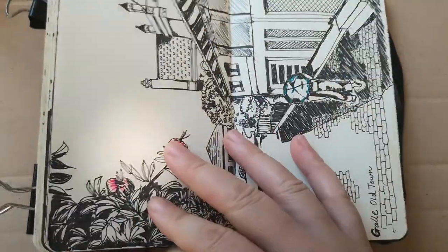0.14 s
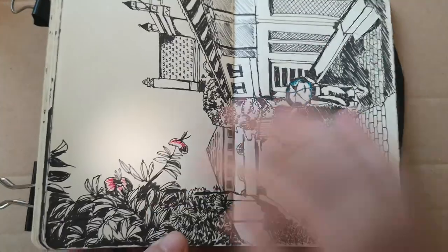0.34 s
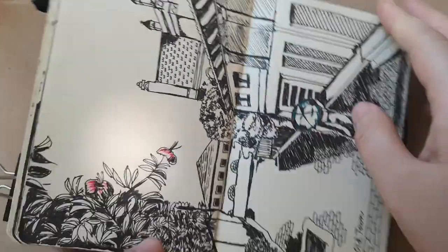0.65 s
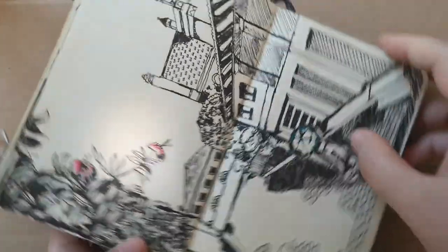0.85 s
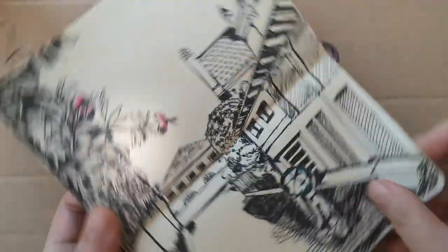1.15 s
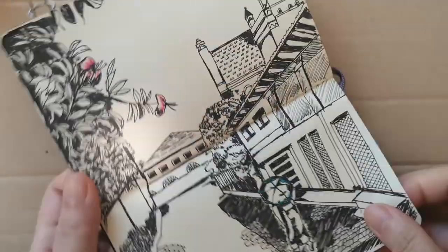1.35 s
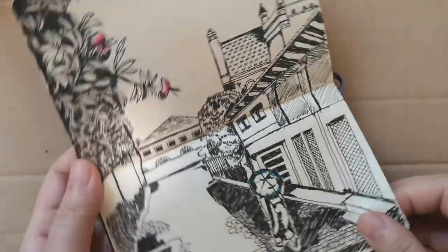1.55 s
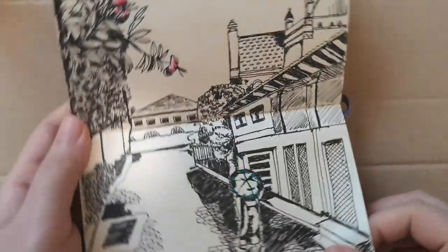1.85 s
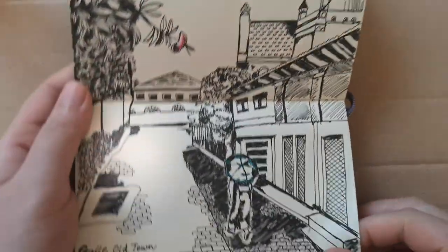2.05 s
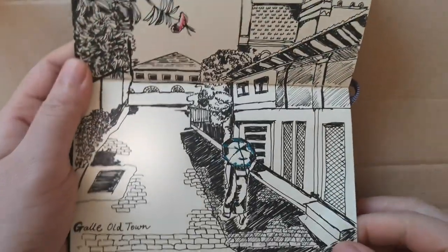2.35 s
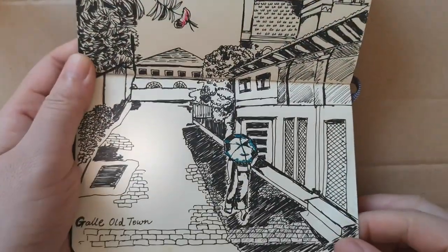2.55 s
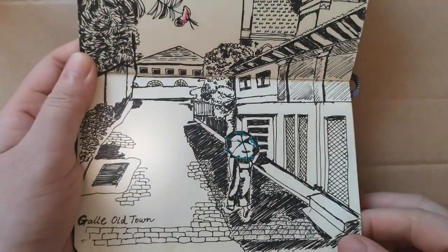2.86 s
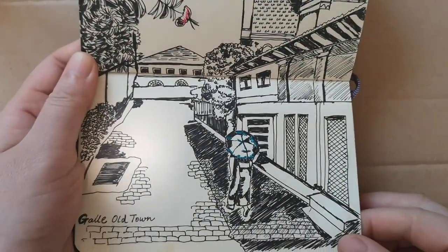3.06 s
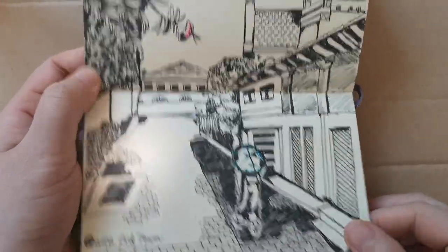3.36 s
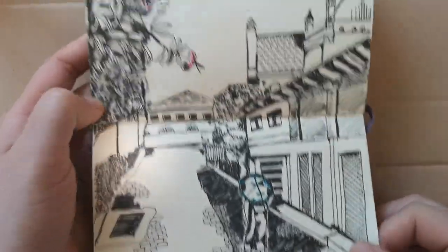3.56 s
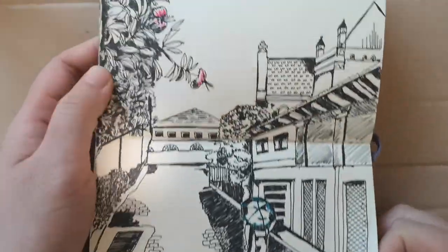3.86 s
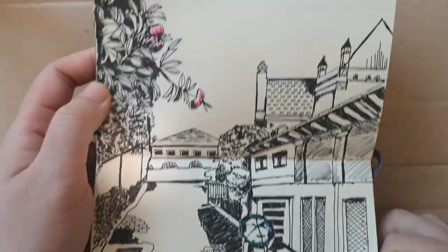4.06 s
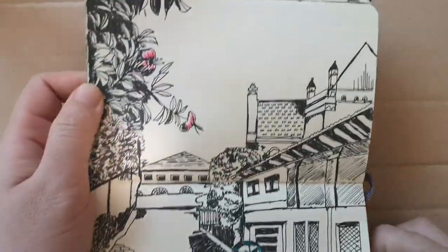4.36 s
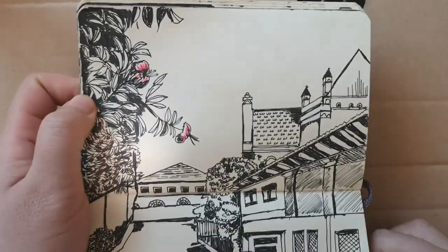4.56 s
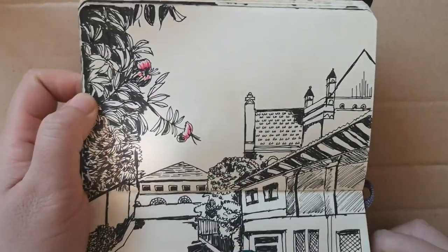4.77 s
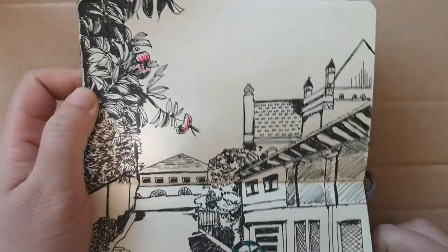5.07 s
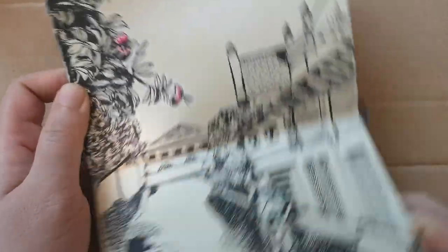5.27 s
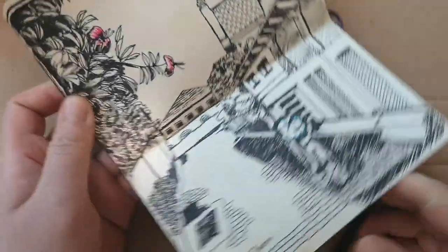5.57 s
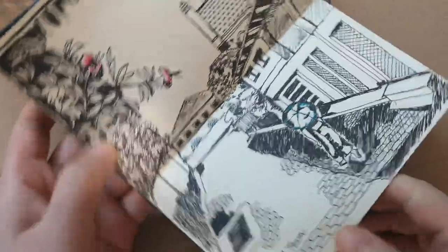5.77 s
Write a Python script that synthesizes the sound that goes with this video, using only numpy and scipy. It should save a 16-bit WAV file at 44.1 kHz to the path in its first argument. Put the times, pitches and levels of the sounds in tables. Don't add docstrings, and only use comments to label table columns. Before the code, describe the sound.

Close stereo phone pickup above a cardboard-covered desk, in a small quiet room with low hum. At 0 s a dull knock and short, already moving scrape with paper rub die away by 0.15 s. Faint rustle and a soft tap come at 0.33 s, light finger hiss and nudges at 0.45-0.7 s. From 0.78 to 1.4 s the book is turned: hollow cardboard scraping, crisp page rubs, buckling crackles, and the loudest thump at 1.22 s, with smaller knocks near 1.34 and 1.39 s. A loose clip lands in four weakening low thuds at 1.6-1.82 s, over soft sliding that fades by 2.4 s. Near silence, one lone knock at 2.73 s. A small knock and rustle at 3.6 s lead to sparse, dry, high spine ticks from 3.7 to 4.67 s, two clearest near 4.38 and 4.67 s. Quiet until 5.2 s, then soft crinkles, swishes and gentle sliding to 5.9 s.

```python
import sys
import numpy as np
from scipy import signal
from scipy.fft import rfft, irfft, next_fast_len
from scipy.io import wavfile
from scipy.ndimage import uniform_filter1d, map_coordinates

SR = 44100
rng = np.random.default_rng(int(sys.argv[2]) if len(sys.argv) > 2 else 0)


def gain_from_decibels(decibels):
    exponent = np.asarray(decibels, float) / 20
    return 10 ** exponent


def put_to_file(sound):
    columns = np.atleast_2d(sound).T
    safe = np.clip(columns, -1, 1)
    whole_steps = np.round(safe * 32767)
    wavfile.write(sys.argv[1], SR, whole_steps.astype(np.int16))


N = 260631
CONTROL_S = np.arange(N * 1000 // SR + 2) / 1000


# time in seconds, left-right in dB.
SIDE_OF_HISS = [(0.0, 6), (0.56, 9.5), (0.79, 1), (0.92, 8.5), (3.09, -1), (3.36, 15), (3.64, 2), (3.8, 6),
                (4.72, 5), (4.99, -3), (5.12, 20), (5.53, 3), (5.91, 9)]


def handling():
    pan_db, = curves(SIDE_OF_HISS)

    def lean(share):
        return gain_from_decibels(share * np.outer([.5, -.5], pan_db - 3.5))

    near = two_mics(cover_scrape() + board_drone())
    near = near + two_mics(page_rub()) * lean(0.3)
    near = near + two_mics(page_swish()) * lean(0.75)
    near = near + two_mics(finger_hiss()) * lean(1.0)
    return filtered(near, lambda hz: 1 / (1 + (hz / 13000) ** 4))


SHIVER_DB = (-12, -21.5, -19, -22.5)
SHIVER_FADES = (237, 200, 190)


def shiver(blows, db, fade):
    after = CONTROL_S - np.array(blows)[:, :1]
    level_db = np.array(blows)[:, 1:] + db - fade * np.abs(after)
    return stretched(np.sqrt(np.sum((after > 0) * gain_from_decibels(level_db) ** 2, axis=0)))


def crack_shiver(part):
    cracks = [(s, db + crack_db) for s, db, _, _, crack_db in KNOCKS]
    return shiver(cracks, SHIVER_DB[part], SHIVER_FADES[part])


def strokes(rows, over=False):
    grip_least_s, creep_s_per_db = 0.0087, 0.0095
    let_go_db_per_s, linger_db, linger_db_per_s = 325, -17, 48.5
    power = 0
    for s, length, db, change_db, *mix in rows:
        u = CONTROL_S - s
        grip_s = grip_least_s + creep_s_per_db * max(-61.5 - db - max(change_db, 0), 0)
        after = np.clip(u - length, 0, 9)
        let_go = gain_from_decibels(-let_go_db_per_s * after * (grip_least_s / grip_s) ** 0.55)
        release = np.hypot(let_go, gain_from_decibels(linger_db - linger_db_per_s * after))
        level = db + over * sum(mix) + change_db * np.clip(u / length, 0, 1)
        grip = np.clip(u / grip_s, 0, 1) if s > 0 else 1
        power = power + (gain_from_decibels(level) * release * grip) ** 2
    return stretched(np.sqrt(power))


def friction(table, grit_db, lumpy_db, patchy_db=3.0):
    grains = gain_from_decibels(grit_db * np.clip(rng.standard_normal((2, N)), -2, 2))
    pressure = gain_from_decibels(lumpy_db * (wobble(30) + wobble(110)))
    drive = rng.standard_normal((2, N)) * grains * pressure
    return unit(patchy(filtered(drive, modes(table)), patchy_db))


def patchy(x, depth_db):
    z = signal.stft(x, nperseg=1024)[2]
    field = uniform_filter1d(rng.standard_normal(z.shape[1:]), size=3, axis=0)
    field = uniform_filter1d(field, size=7, axis=1)
    return signal.istft(z * gain_from_decibels(depth_db * unit(field)), nperseg=1024)[1][:, :N]


# start in seconds, length in seconds, scrape level in dB,
# change along the stroke in dB, desk drone over the scrape in dB.
DRAGS = [(0, 0.092, -47, -4, -11), (.333, .12, -78, -5, 2), (.46, 0.27, -80.5, 18, 0.5),
         (.776, 0.19, -49, 1.5, -1.5), (1.0, 0.19, -48.5, -8.5, 3.5), (1.195, 0.023, -46, -0.5, 2.5),
         (1.25, 0.16, -47.5, -6.5, 1.5), (1.55, 0.13, -66.5, 5, 3.5), (1.66, 0.45, -58, -11.5, -4.5),
         (2.06, 0.31, -75, -4, -2.5), (2.9, 0.38, -75.5, -0.5, -5.5), (3.33, 0.12, -79, 12, 7),
         (2.4, 0.34, -85, -5.5, 8), (4.3, 0.93, -86, -4.5, 5), (3.8, 0.71, -74.5, -11, 2),
         (5.23, 0.17, -65, -1.5, -2), (5.56, 0.46, -71.5, -7.5, -3)]
# resonance in Hz, width in Hz, level in dB.
BOARD = [(520, 270, -14), (698, 114, -7), (924, 80, 0), (1222, 122, -3), (1610, 247, -8.5)]


def cover_scrape():
    gain = np.hypot(strokes(DRAGS), crack_shiver(0))
    return gain_from_decibels(2.0) * gain * friction(BOARD, grit_db=3.5, lumpy_db=0.0)


# resonance in Hz, width in Hz, level in dB.
DRONE = [(142.5, 53, -2.5), (241, 106, 0.5), (323.4, 82, 2), (420, 63, -1), (467, 82, -8)]


def board_drone():
    return gain_from_decibels(3.5) * desk_drive() * friction(DRONE, grit_db=3.5, lumpy_db=1.6)


def desk_drive():
    thuds = shiver([k[:2] for k in KNOCKS + REBOUNDS], SHIVER_DB[2], SHIVER_FADES[2])
    landings = shiver([b[:2] for b in BOUNCES], SHIVER_DB[3], SHIVER_FADES[2])
    return np.hypot(strokes(DRAGS, over=True), np.hypot(thuds, landings))


# start in seconds, length in seconds, rub level in dB,
# change along the stroke in dB, swish over the rub in dB.
PAGES = [(0, 0.11, -44, -13.5, -10.5), (.333, 0.096, -56, -13, -12), (.46, 0.27, -77.5, 16, -0.5),
         (.775, 0.04, -56, 11.5, -12), (.81, 0.18, -43.5, -13, -10.5), (.995, 0.065, -54, -1.5, 4),
         (1.07, 0.12, -54.5, -4, -2), (1.19, 0.033, -51, -4.5, -1), (.15, 0.22, -79, 6.5, -10),
         (1.228, 0.19, -49, -6, -2), (1.5, 0.31, -67.5, 8, -3), (1.82, 0.2, -56.5, -6, -6),
         (1.99, 0.39, -68.5, -12, 1.5), (3.29, 0.14, -77, 7.5, -1.5), (3.6, 0.25, -62, -4.5, -8),
         (3.8, 0.56, -70.5, -13, -6), (4.2, 0.45, -73.5, -12.5, 4), (5.18, 0.069, -79, 10, 13),
         (5.247, 0.07, -66, 4, 3), (5.33, 0.14, -65, -5, 4.5), (5.56, 0.37, -65.5, -8.5, 2),
         (5.902, .03, -50, 5, -21)]
# resonance in Hz, width in Hz, level in dB.
PAPER = [(1883, 387, 0.5), (2410, 587, 0.5), (2880, 570, -3.5)]


def page_rub():
    gain = np.hypot(strokes(PAGES), crack_shiver(1))
    return gain_from_decibels(3.0) * gain * friction(PAPER, grit_db=4.0, lumpy_db=0.2)


# resonance in Hz, width in Hz, level in dB.
SHEET = [(3420, 1800, -2.5), (3950, 250, 5.5), (4500, 1160, -7.5)]


def page_swish():
    return gain_from_decibels(3.0) * strokes(PAGES, over=True) * friction(SHEET, grit_db=4, lumpy_db=1.15)


# start in seconds, length in seconds, hiss level in dB,
# change along the stroke in dB.
SLIDES = [(0, 0.079, -56.5, -4), (.33, 0.063, -68, 7), (.43, 0.032, -63, -2.5), (.488, 0.15, -62, -4.5),
          (.63, 0.14, -62, -2), (.782, 0.24, -59.5, -2.5), (.989, 0.048, -47.5, 2.5), (1.06, 0.073, -56, 4),
          (.15, 0.23, -83.5, 10.5), (1.15, .18, -55.5, 2), (1.328, 0.095, -42.5, -8),
          (1.46, 0.12, -72.5, 4), (1.62, .4, -62, -2), (2.0, 0.42, -67.5, -7), (2.4, 1.1, -84, -3),
          (2.734, .08, -79, -10), (3.27, 0.18, -74.5, 4), (3.59, 0.22, -61.5, -21), (3.775, 0.078, -63, -5),
          (3.85, 1.27, -73, -15), (5.185, .07, -78, 12.5), (5.26, 0.2, -64, 5), (5.49, 0.41, -65, 0)]
# resonance in Hz, width in Hz, level in dB.
SKIN = [(5470, 1030, 4.5), (7780, 910, 11.5), (9640, 530, -1), (12500, 4000, -25)]


def finger_hiss():
    return gain_from_decibels(1.0) * strokes(SLIDES) * friction(SKIN, grit_db=4.0, lumpy_db=0.85)


# time in seconds, peak in dB, pitch in Hz, lid mode in dB, crack in dB.
KNOCKS = [(.024, -29, 225, -18, -23), (0.335, -57.5, 124.3, -21, 5), (0.598, -45, 117, -6.5, -15),
          (.782, -46, 300, -2, 3), (.993, -35, 135, -4.5, -14), (1.074, -40, 357, -9, 1),
          (1.2247, -13, 158, -22, -17), (1.235, -29, 276, -4, 4), (1.338, -25, 300, -32, -23),
          (1.386, -29.5, 177, -27, -9.5), (2.731, -37, 204.6, -9, -5), (3.439, -54.5, 149, -3.5, -7.5),
          (3.587, -39, 260, 0, 3.5), (3.773, -47, 340, -1, 1), (5.451, -52, 370, -12, 3),
          (5.567, -50.5, 353, -23, -1), (5.578, -55, 206.6, -7, 5), (5.904, -61, 120, -10, 6)]
# time in seconds, peak in dB, pitch in Hz, lid mode in dB.
REBOUNDS = [
    (.0372, -31, 235, -21),
    (.072, -38, 150, -12),
    (.095, -42, 160, -10),
    (2.7405, -40, 222, -20),
    (3.5912, -32, 140, -2),
    (1.3945, -36, 200, -15),
]
# resonance in Hz, width in Hz, level in dB.
CRACK = [(750, 70, -8), (920, 150, 8.5), (1180, 150, 2), (1410, 140, -1), (1740, 210, 6.5), (1995, 370, 5),
         (2420, 650, 1), (3150, 400, -4.5), (7600, 560, -14.5)]


def knocks():
    hard_ring_s, ring_s_per_db = 0.098, 0.01
    stiff_hz = 228
    thud, burst, t = np.zeros(N + SR), np.zeros((2, N + SR)), np.arange(SR // 2) / SR
    chance = rng.standard_normal((len(KNOCKS), 2, len(t)))
    contacts = [*zip(KNOCKS, chance)] + [((*row, 0), 0) for row in REBOUNDS]
    glide = t + 0.00056 * (1 - np.exp(-t / 0.0016))
    for (s, db, hz, lid_db, crack_db), noise in contacts:
        t60 = hard_ring_s + ring_s_per_db * max(-33.5 - db, 0) * min(stiff_hz / hz, 1) ** 2.5
        at = slice(round(s * SR), round(s * SR) + len(t))
        note = np.sin(2 * np.pi * hz * glide) * gain_from_decibels(-60 * t / t60)
        lid = np.sin(2 * np.pi * 410 * t) * gain_from_decibels(lid_db - 60 * t / 0.19)
        thud[at] -= gain_from_decibels(db) * (note + lid) * (1 - np.exp(-t / 0.0022))
        fade = gain_from_decibels(-60 * t / 0.0042) + gain_from_decibels(-16.5 - 60 * t / 0.4)
        burst[:, at] += gain_from_decibels(db + crack_db) * noise * fade
    return thud[:N], gain_from_decibels(11) * filtered(burst[:, :N], modes(CRACK))


# time in seconds, peak in dB, stand ring in dB.
BOUNCES = [
    (1.599, -20.5, 2),
    (1.698, -22, 0.5),
    (1.764, -25, 4),
    (1.815, -26.5, -10),
]
# delay in seconds, level in dB.
RATTLE = [
    (0, 1),
    (0.0135, -3),
    (0.0207, -3.5),
]
# pitch in Hz, t60 in seconds.
STAND = (87, 0.33)


def bounces():
    out, t = np.zeros(N + SR), np.arange(SR // 2) / SR
    stand_hz, stand_t60 = STAND

    def push(u):
        return np.sin(2 * np.pi * 160 * u - 1.6) * np.exp(-((u - .0055) / 0.0044) ** 2) * (u > 0)

    pushes = sum(gain_from_decibels(db) * push(t - s) for s, db in RATTLE)
    ring = -gain_from_decibels(-60 * t / stand_t60) * np.sin(2 * np.pi * stand_hz * t) * (1 - np.exp(-(t / 0.042) ** 4))
    for s, db, ring_db in BOUNCES:
        after = out[round(s * SR):][:len(t)]
        after[:] = after * np.exp(-t / 0.0032) + gain_from_decibels(db - 2.0) * (pushes + gain_from_decibels(ring_db) * ring)
    return out[:N]


# time in seconds, rms in dB, pitch in Hz, t60 in seconds, left-right in dB.
CREASES = [(.7853, -44, 1670, .04, 4), (.8097, -42, 2200, .04, 6), (.822, -45, 2300, .04, 4),
           (.834, -42, 1900, 0.056, 4), (.873, -46, 2000, .04, 4), (.908, -43, 2200, .06, 4),
           (.925, -42, 1010, .06, 0), (.9958, -44, 1830, .03, 5), (1.012, -43, 4400, 0.067, 10),
           (1.0357, -44, 4430, .05, 9), (1.2033, -42, 2410, .06, 4), (1.2353, -38, 1870, 0.036, 4),
           (1.236, -41, 3100, 0.027, 4), (1.246, -36, 1100, .06, 2), (1.247, -39, 2400, .04, 2),
           (1.262, -44, 2100, .04, 4), (1.29, -43, 1750, 0.13, 2), (1.3315, -45, 2100, .04, 2),
           (1.333, -43, 4600, .05, 7), (1.3879, -46, 1880, .05, 4), (.334, -48, 1800, .025, 5),
           (3.377, -63, 1800, .05, 5), (3.606, -52, 1650, .05, 3), (3.618, -54, 1940, .1, 3),
           (3.66, -57, 1750, .12, 3), (3.775, -53, 1050, 0.078, 5), (3.776, -54, 2400, .06, 3),
           (5.2038, -69, 3820, .06, 11), (5.2497, -57, 2770, .04, 8), (5.2505, -57, 1100, .04, 2),
           (5.266, -53, 4000, .04, 8), (5.2741, -50, 4010, .05, 8), (5.292, -52, 3500, .05, 8),
           (5.302, -56, 3000, .05, 6), (5.296, -55, 2050, .1, 4), (5.32, -57, 2700, .05, 5),
           (5.4512, -52, 2200, .05, 3), (5.5749, -56, 1270, .06, 3), (5.6303, -61, 3780, .08, 6),
           (3.433, -63, 1100, .1, 3)]


def creases():
    sharpness, grit_db, rise_s = 4.5, 6, .0008
    out, t = np.zeros((2, N + SR)), np.arange(SR // 5) / SR
    f = np.fft.rfftfreq(2 * len(t), 1 / SR)
    chance = rng.standard_normal((len(CREASES), 3, len(t)))
    for (s, db, hz, t60, pan_db), (noise, other, grit) in zip(CREASES, chance):
        right = 0.6 * np.roll(noise, 24) + 0.8 * other
        drive = unit(np.array([noise, right]) * gain_from_decibels(grit_db * grit.clip(-2, 2)))
        drive = drive * gain_from_decibels(-60 * t / t60) * (1 - np.exp(-t / rise_s))
        panel = modes([(hz, hz / sharpness, 0)])(f) * np.sqrt(SR * sharpness / (np.pi * hz))
        sides = gain_from_decibels(db + pan_db * np.array([[.5], [-.5]]))
        burst = irfft(rfft(drive, 2 * len(t)) * panel)[:, :len(t)]
        out[:, round(s * SR):][:, :len(t)] += sides * burst
    return out[:, :N]


# time in seconds, peak in dB, pitch in Hz.
SPINE = [(3.7053, -49, 3900), (3.738, -53, 3990), (3.774, -52, 4100), (3.8293, -49, 4170),
         (3.858, -50, 4500), (3.8793, -52, 3680), (3.894, -49, 3820), (3.9031, -46.5, 4350),
         (3.9335, -48, 3930), (3.962, -49, 4100), (4.0137, -48.5, 3960), (4.034, -56, 4500),
         (4.0517, -54, 4050), (4.0672, -54, 3950), (4.1773, -54, 4070), (4.263, -48.5, 4060),
         (4.2824, -48, 4000), (4.375, -39, 4000), (4.5188, -59, 3810), (4.5675, -44.5, 4200),
         (4.644, -52.5, 4000), (4.6683, -38, 4060)]
# time in seconds, peak in dB, pitch in Hz.
FURTHER_TICKS = [(3.378, -57, 4100), (3.68, -57, 3600), (3.694, -54, 3700), (3.72, -56, 4300), (3.985, -56, 3920),
                 (4.001, -59, 4000), (4.1481, -59, 4060), (4.1596, -56, 3740), (4.2374, -59, 3470),
                 (4.3561, -58, 3910), (4.4359, -58, 3800)]
# time in seconds, peak in dB, left-right in dB, pitch in Hz, high mode in dB.
SNAPS = [(.086, -47, 2.5, 4000, 0), (.3994, -54, 6, 3380, -11), (.497, -62.5, 15, 4460, 5),
         (.6335, -48, 14, 4600, -4.5), (.8081, -42, 10, 3950, -7), (.9978, -39, 18, 4400, 2.5),
         (1.5263, -57, 11, 3870, -16), (1.6104, -49, 10, 3560, -7), (4.2928, -50.5, 12, 3980, -10),
         (4.408, -54, 8, 3880, -17), (5.25, -44, 24, 4140, -17), (5.4514, -47, 4.4, 4620, -22)]


def ticks(spine, snaps=()):
    out, t = np.zeros((2, N + SR)), np.arange(SR // 30) / SR
    spine_pan_db, spine_high_db = 16, -16
    rows = [(s, db, spine_pan_db, hz, spine_high_db) for s, db, hz in spine] + list(snaps)
    attack = 1 - np.exp(-(t / 0.00017) ** 2)
    for (s, db, pan_db, hz, high_db), u in zip(rows, rng.random((len(rows), 3, 16))):
        stutter_s = .005 + 0.0042 * np.clip((db + 49.0) / 8, 0, 1)
        slips = np.zeros(len(t))
        slip_at = (u[0] ** 1.3 * stutter_s * SR).astype(int)
        slips[slip_at] = np.sign(u[1] - .5) * gain_from_decibels(-9 * u[2] - 5.1 * u[0])
        notes = [(hz, 0, 0.0057), (7330, high_db + 7.5, 0.0076), (1130, -20, 0.023), (5780, -7.5, 0.0073),
                 (2894, -14.0, 0.019), (1950, -17, 0.006), (9100, -14.5, 0.0039)]
        body = sum(gain_from_decibels(d - 60 * t / t60) * np.sin(2 * np.pi * f * t) for f, d, t60 in notes)
        tick = gain_from_decibels(db + 2.5) * np.convolve(slips, body * attack)[:len(t)]
        out[0, round(s * SR):][:len(t)] += tick
        out[1, round(s * SR) + 10:][:len(t)] += gain_from_decibels(-1.2 * pan_db) * tick
    return out[:, :N]


# frequency in Hz, common share of the sound (0 to 1).
DIRECT = [(60, 0.66), (130, 1), (300, 0.86), (700, 0.42), (2000, 0.1), (8000, 0.25)]
# frequency in Hz, left-right in dB.
BALANCE = [(60, -0.5), (380, 0), (540, -8.5), (720, 8), (950, 5), (1290, 0), (2380, 2.5), (4400, 4.5),
           (7400, 4.5), (8600, 2), (9500, -11), (11000, -5.5), (15000, 2.5)]


def two_mics(pair, lag_s=0.000553):
    def paths(hz):
        share, shade = np.clip(along(DIRECT, hz), 0, 1), gain_from_decibels(along(BALANCE, hz) / 2)
        delay = np.exp(-2j * np.pi * hz * lag_s)
        return [shade, share / shade * delay, np.sqrt(1 - share ** 2) / shade]
    left, late, other = filtered(pair[[0, 0, 1]], paths)
    return np.array([left, late + other])


# frequency in Hz, t60 in seconds.
ROOM = [(100, 0.14), (1000, 0.88), (4000, 0.33), (12000, 0.24)]


def room(x):
    hz, t, z = signal.stft(rng.standard_normal((2, SR // 2)), SR, nperseg=256)
    tail = signal.istft(z * gain_from_decibels(-60 * t / along(ROOM, hz)[:, None]), SR, nperseg=256)[1]
    tail = tail / np.linalg.norm(tail[0])
    return signal.fftconvolve(np.pad(x, (250, 0))[None], tail, axes=1)[:, :N]


# time in seconds, peak in dB, pitch in Hz, half length in seconds.
JOLTS = [
    (0.04, -29, 44, 0.014),
    (0.37, -52, 90.6, 0.037),
    (0.618, -37.5, 46.6, 0.019),
    (0.695, -50.5, 66, 0.029),
    (0.832, -45, 41, 0.013),
    (1.092, -34, 47.7, 0.012),
    (1.247, -39, 45.3, 0.045),
    (1.396, -43, 40.6, 0.035),
    (1.721, -38.5, 31.9, .04),
    (4.851, -53.5, 85, 0.041),
]


def jolts():
    t, out = np.arange(N) / SR, np.zeros(N)
    for s, db, hz, half in JOLTS:
        out -= gain_from_decibels(db) * np.cos(2 * np.pi * hz * (t - s)) * np.exp(-((t - s) / half) ** 2)
    return out


# resonance in Hz, width in Hz, level in dB.
RUMBLE = [(90, 16, -2), (161.5, 87, -8.5)]


def rumble_and_sway():
    follow_s = 0.084
    busy = np.sqrt(np.abs(uniform_filter1d(desk_drive() ** 2, size=int(follow_s * SR))))

    def moving(table, rest_db, over_drive_db):
        noise = filtered(rng.standard_normal(N), lambda hz: modes(table)(hz) ** 2)
        return np.hypot(gain_from_decibels(rest_db), gain_from_decibels(over_drive_db) * busy) * unit(noise)

    return gain_from_decibels(3.5) * moving(RUMBLE, -70, -13.5) + gain_from_decibels(8.5) * moving([(33, 30, 0)], -74, -17)


# hum in Hz, wander in Hz, swell in dB.
BOOM = (58, 2.2, 2.4)
# time in seconds, level in dB.
HUM = [(0, -54), (.5, -75.5), (1.22, -56), (1.45, -74), (2.1, -71.5), (2.8, -63), (3.3, -65.5),
       (3.6, -59.5), (4.15, -60.5), (4.9, -60.5), (5.3, -63), (5.91, -61)]


def far_hum():
    hum_hz, wander_hz, swell_db = BOOM
    boom_db, = curves(HUM)
    swell = gain_from_decibels(swell_db * wobble(7))
    phase = 2 * np.pi * np.cumsum(hum_hz + wander_hz * wobble(22)) / SR
    return gain_from_decibels(boom_db + 3.0) * unit(swell * np.sin(phase))


# frequency in Hz, level in dB per Hz.
AIR = [(12, -40.5), (20, -15.5), (64, 24), (122, -13.5), (213, -13), (252, -45), (306, -36.5), (478, -37),
       (812, -39), (933, -45.5), (1300, -45), (2090, -42.5), (2760, -46.5), (4440, -54), (15500, -68)]
# frequency in Hz, left-right likeness (-1 to 1).
ALIKE = [(60, 0.4), (99, 0.13), (160, 0.12), (270, 0.58), (450, -0.73), (740, -0.61), (1220, 0.55),
         (2010, -0.12), (3330, -0.049), (5500, 0.11), (9080, -0.11), (15000, -0.35)]


def still_air():
    def colour(hz):
        turn = np.arccos(np.clip(along(ALIKE, hz), -1, 1)) / 2
        return gain_from_decibels(along(AIR, hz)) * (hz / (hz + 130)) ** 6 * [np.cos(turn), np.sin(turn)]
    mid, side = filtered(rng.standard_normal((2, N)), colour)
    air = np.array([mid + side, mid - side]) / np.std(filtered(mid, lambda hz: hz > 500))
    return gain_from_decibels(-74.5 + wobble(3.4) / 2) * patchy(air, depth_db=2.5)


def background():
    return still_air() + far_hum() + rumble_and_sway() + jolts()


def unit(x):
    return x / np.sqrt(np.mean(x ** 2) + 1e-20)


def along(points, hz):
    f, v = np.transpose(points)
    return np.interp(np.log(hz + 1), np.log(f + 1), v)


def curves(rows):
    s, *cols = np.transpose(rows)
    return [np.interp(np.arange(N) / SR, s, c) for c in cols]


def stretched(control):
    return np.interp(np.arange(N) / SR, CONTROL_S, control)


def wobble(rate):
    knots = rng.standard_normal(int(N * rate / SR) + 4)
    return map_coordinates(knots, [np.arange(N) * rate / SR])


def filtered(x, response):
    m = next_fast_len(N + SR // 2)
    return irfft(rfft(x, m) * response(np.fft.rfftfreq(m, 1 / SR)), m)[..., :N]


def modes(table):
    def response(f):
        return sum((-1) ** k * gain_from_decibels(db) * 1j * f * width / (hz * hz - f * f + 1j * f * width)
                   for k, (hz, width, db) in enumerate(table))
    return response


def scene():
    thud, crack = knocks()
    low, small = thud + bounces(), ticks(SPINE, SNAPS)
    struck = two_mics(np.array([low, gain_from_decibels(-40) * np.roll(low, 90)]) + crack)
    echo = room(gain_from_decibels(-25.0) * crack[0] + gain_from_decibels(-17.5) * small[0] + gain_from_decibels(-24.0) * low)
    return handling() + struck + creases() + small + ticks(FURTHER_TICKS) + echo + background()


def low_pass(x):
    return signal.sosfilt(signal.butter(12, 15680, fs=SR, output="sos"), x)


def record(dry):
    top_hz = 15650
    mix = filtered(dry, lambda hz: hz < top_hz)
    return low_pass(mix)


dry = scene()
out = record(dry)
put_to_file(out)
```